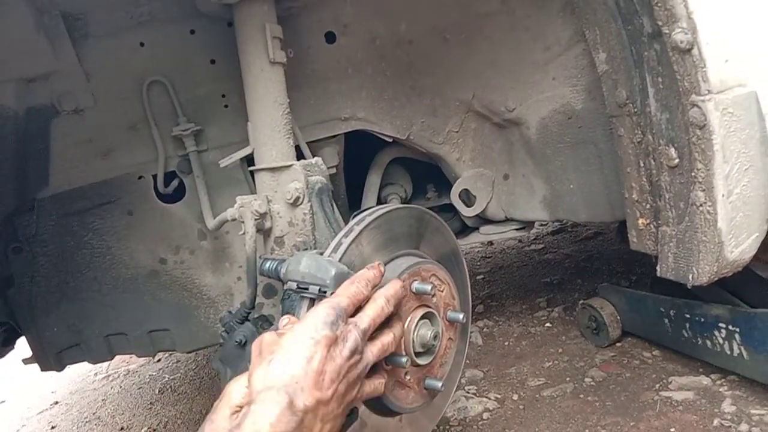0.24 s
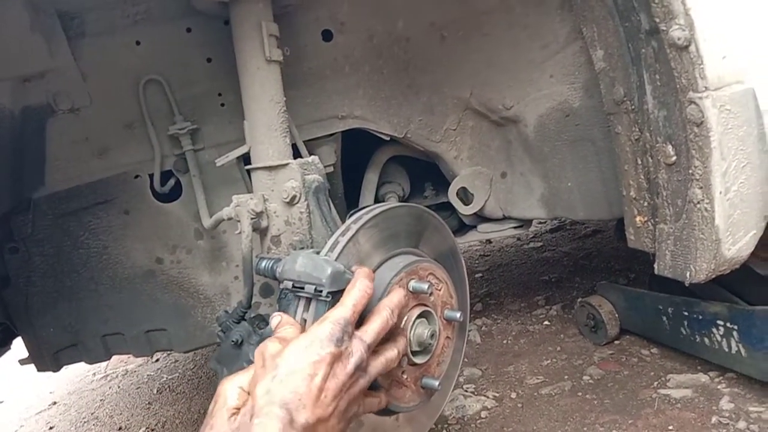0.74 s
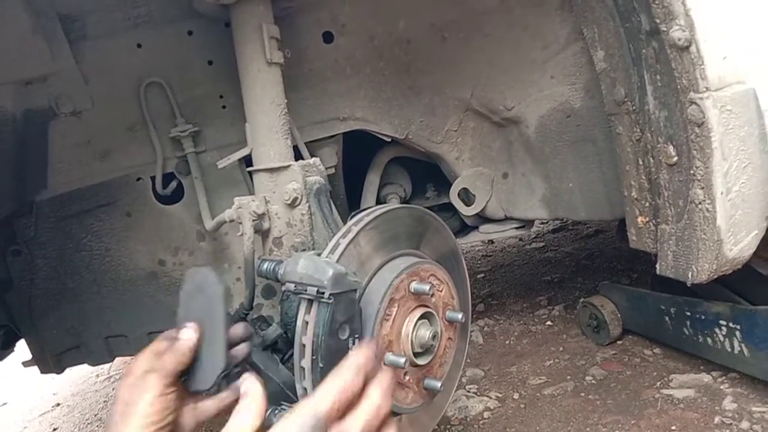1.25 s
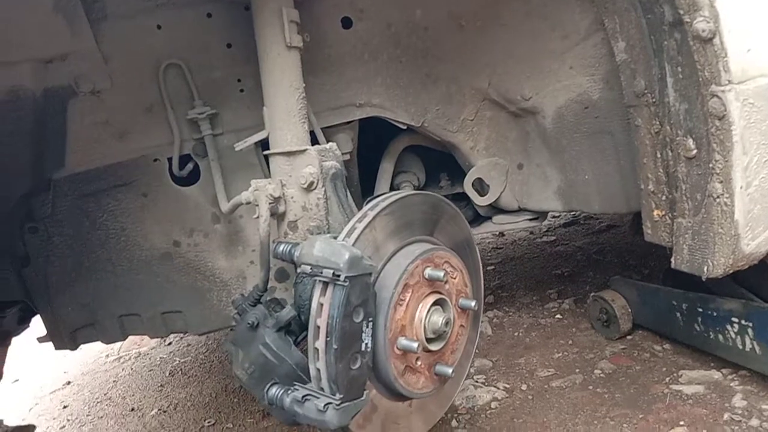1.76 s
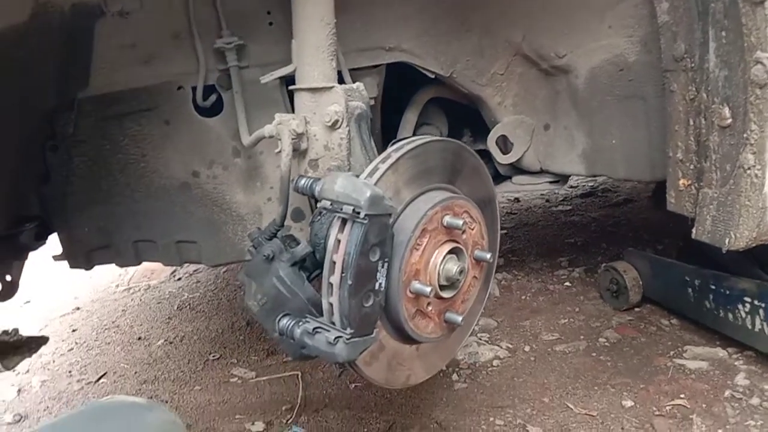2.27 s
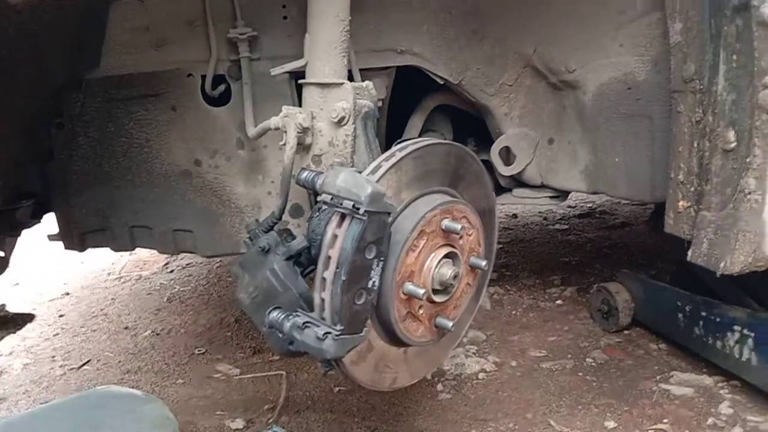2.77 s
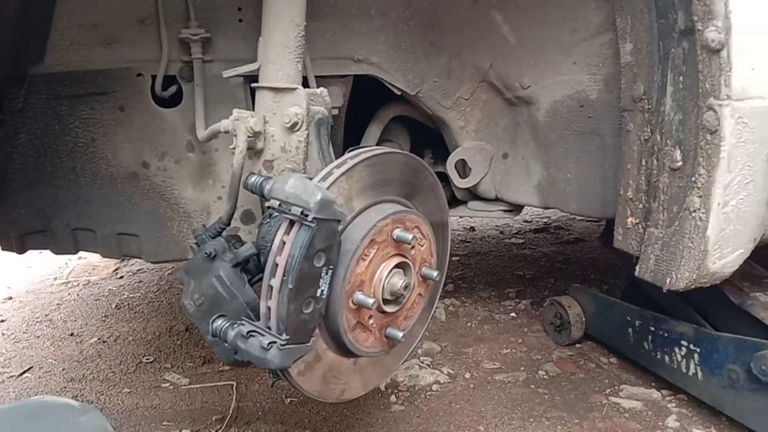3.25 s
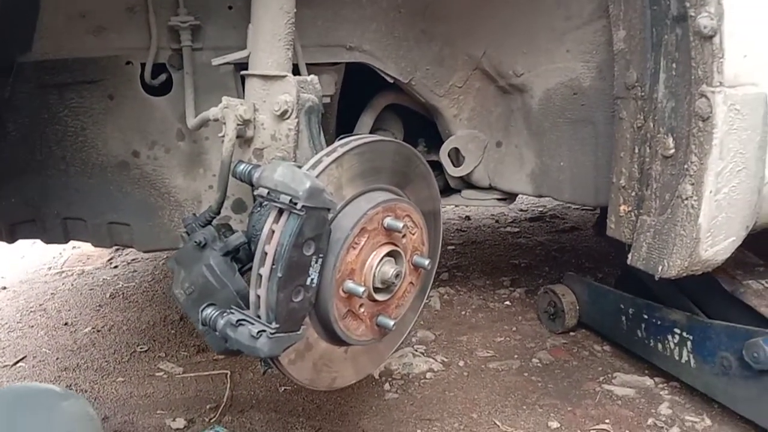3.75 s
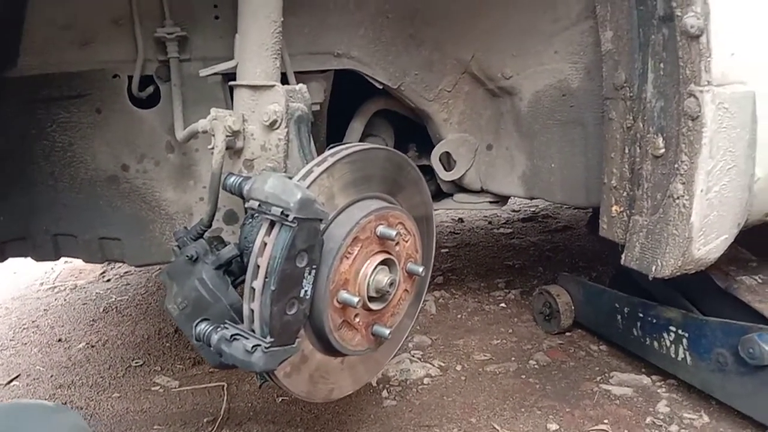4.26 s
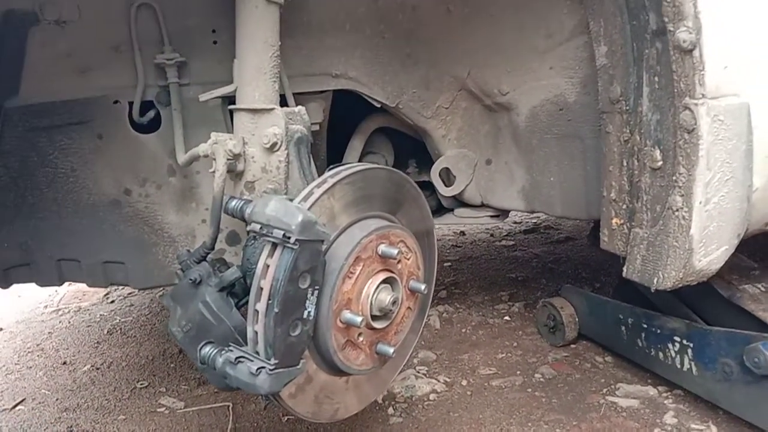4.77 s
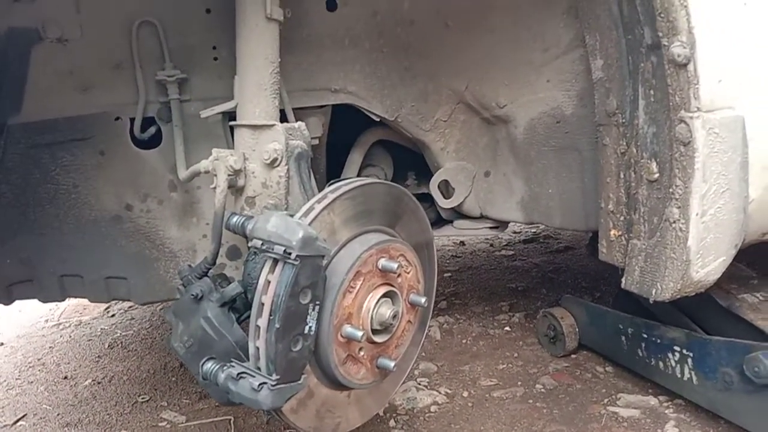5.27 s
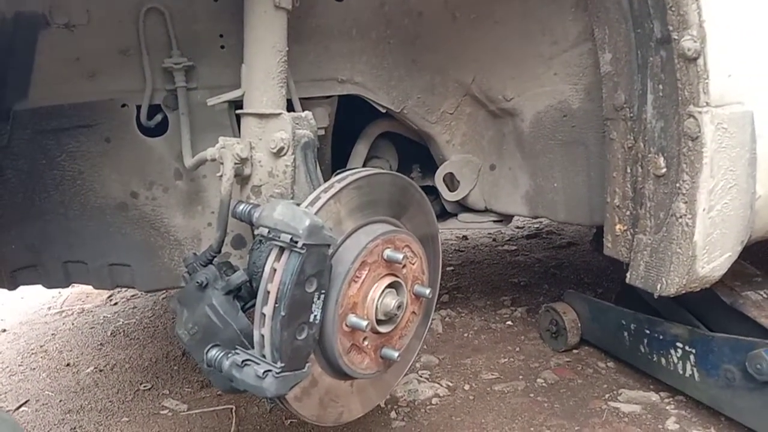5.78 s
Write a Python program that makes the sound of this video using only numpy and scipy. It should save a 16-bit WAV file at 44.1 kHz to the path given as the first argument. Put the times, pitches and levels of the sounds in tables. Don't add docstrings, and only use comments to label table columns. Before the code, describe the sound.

Distant hammering on steel echoes around an open yard while a brake pad knocks and squeaks into place nearby, then clatters hard on the ground.

```python
import sys
import numpy as np
from scipy import signal
from scipy.fft import rfft, irfft, next_fast_len
from scipy.io import wavfile
from scipy.ndimage import uniform_filter1d

SR = 44100
rng = np.random.default_rng(int(sys.argv[2]) if len(sys.argv) > 2 else 0)


def transcribe(signal):
    frames = np.atleast_2d(signal).T
    limited = np.clip(frames, -1, 1)
    pcm = np.round(limited * 32767).astype(np.int16)
    wavfile.write(sys.argv[1], SR, pcm)


def voltage_ratio(decibels):
    exponent = np.asarray(decibels, float) / 20
    return 10 ** exponent


N = 265526
SPAN = 16384
TOP_HZ = 15600
T, F = np.arange(SPAN) / SR, np.arange(SPAN // 2 + 1) * SR / SPAN
FADE = np.cos(np.pi * T * SR / SPAN / 2)
SCENE_F = np.arange(N // 2 + 1) * SR / N
RING_T = np.arange(SR // 2) / SR


def colour(f, points):
    hz, db = np.transpose(points)
    return voltage_ratio(np.interp(np.log(f + 1), np.log(hz), db))


def peak(f, hz, width):
    return 1 / (1 + 2j * (f - hz) / width)


def low(f, hz):
    return 1 / (1 + 1.4j * f / hz - (f / hz) ** 2) ** 2


def high(f, hz):
    return low(f, hz) * (f / hz) ** 4


def causal(gain):
    cepstrum = irfft(np.log(gain + 1e-9))
    half = len(cepstrum) // 2
    cepstrum[1:half] *= 2
    cepstrum[half + 1:] = 0
    return np.exp(rfft(cepstrum))


def swell(t, rise, t60):
    return (1 - np.exp(-(t / max(rise, 1e-4)) ** 2)) * voltage_ratio(-60 * t / max(t60, .01))


def add(out, s, x):
    i = int(s * SR)
    out[i:i + len(x)] += x[:N - i]


def level_to(x, db):
    return voltage_ratio(db) * x / np.sqrt(uniform_filter1d(x ** 2, size=200).max())


def curve(table):
    s, *columns = np.transpose(table)
    return [np.interp(np.arange(N) / SR, s, c) for c in columns]


def walk(rate, size=N):
    k = int(SR / rate)
    steps = np.repeat(rng.standard_normal(size // k + 1), k)
    return 1.28 * uniform_filter1d(uniform_filter1d(steps, k), k)[:size]


def noise(gain):
    size = next_fast_len(N)
    places = np.linspace(0, len(gain) - 1, size // 2 + 1)
    gain = np.interp(places, np.arange(len(gain)), np.abs(gain))
    x = irfft(gain * rfft(rng.standard_normal(size)), size)[:N]
    return x / np.std(x)


# (time [s], far bustle [dB], feet and cloth scuffing close by [dB])
BUSTLE = [(0.0, -38.5, -56), (0.22, -46, -60.5), (1.26, -47.5, -66), (2.9, -51.5, -65), (3.35, -51, -55.5),
          (3.62, -53, -62.5), (4.04, -49.5, -60), (4.21, -75, -40.5), (4.54, -53.5, -67),
          (5.72, -51, -56.5), (6.02, -58.5, -61)]
# (level at usual bustle [dB], rise per bustle [dB/dB], scuff level [dB])
FOLLOW = [
    (-69.5, -0.7, 2),
    (-74, 1, -1),
    (-50, 1, -1),
    (-63.5, 0.62, -12),
]


def bustle():
    far, near = curve(BUSTLE)
    levels = []
    for db, share, near_db in FOLLOW:
        power = voltage_ratio(db + share * (far + 49.5)) ** 2 + voltage_ratio(near + near_db) ** 2
        levels.append(10 * np.log10(power))
    whistle_db = -56 + 0.94 * (far + 50)
    return levels + [whistle_db]


# (time [s], drone level [dB])
MACHINE_LOAD = [(0.0, -57.5), (1.02, -60.5), (1.36, -59), (2.13, -62), (2.67, -54.5), (3.17, -62),
                (4.12, -56.5), (4.24, -59), (4.38, -61), (4.84, -65), (5.35, -63.5), (6.02, -66)]


def machine(whistle_db):
    drone_hz, drone_width, whistle_hz, whistle_width = 96.2, 39, 1267, 108
    f = SCENE_F
    drone = noise(peak(f, drone_hz, drone_width) * high(f, 40.0) * low(f, 267))
    drone = drone * voltage_ratio(4.5 + curve(MACHINE_LOAD)[0] + 3.2 * walk(20.99))
    whistle = noise(peak(f, whistle_hz, whistle_width) ** 2)
    return drone + voltage_ratio(whistle_db + 2.3 * walk(12)) * whistle


# (frequency [Hz], level per Hz [dB])
YARD = [(18, -43), (30, -0.5), (102, -1.5), (270, -8.5), (591, -5.5), (830, -13.5), (1080, -10.5),
        (1260, 0), (1510, -9), (3590, -12.5), (4660, -33), (8280, -38.5), (9430, -32), (12300, -64),
        (15500, -40.5)]


def yard():
    low_db, hollow_db, mid_db, high_db, whistle_db = bustle()
    out = machine(whistle_db)
    shape = colour(SCENE_F, YARD)
    # (first band [Hz], reference span from [Hz], to [Hz], level [dB])
    regions = [(30, 200, 600, low_db), (620, 650, 1100, hollow_db),
               (1150, 1500, 4500, mid_db), (4600, 5000, 15500, high_db)]
    for hz in 35 * 2 ** np.arange(0, 9, .5):
        _, lo, hi, db = [r for r in regions if r[0] <= hz][-1]
        band = shape * np.exp(-(np.log2((SCENE_F + 1) / hz) * 2) ** 2)
        inside = (SCENE_F > lo) & (SCENE_F < hi)
        share = np.sqrt(np.sum(band ** 2) / np.sum(shape[inside] ** 2))
        flicker_db, trim_db = (4.4, 5.5) if hz < 1100 else (3.2, 4.4)
        out = out + voltage_ratio(db + flicker_db * walk(18) - trim_db) * share * noise(band)
    return out


def clutter(lo_hz, ratio, level_db, t60):
    out, t = np.zeros(N), T[:SPAN // 2]
    for when, pitch, size, phase in rng.random((int(70 * N / SR), 4)):
        hz = min(lo_hz * ratio ** pitch, TOP_HZ)
        gain = colour(hz, YARD) * np.sqrt(hz) * voltage_ratio(11 * size)
        add(out, when * N / SR, gain * swell(t, 0.011, t60) * np.sin(2 * np.pi * (hz * t + phase)))
    return out / np.std(out) * voltage_ratio(level_db)


# (time [s], peak level [dB], centre [Hz], t60 [s])
TICKS = [(.098, -46.5, 5970, 0.21), (0.611, -51, 5300, 0.21), (0.741, -43, 14700, 0.12),
         (0.828, -41.5, 6900, 0.086), (.83, -35.5, 15400, 0.034), (1.373, -48, 5340, 0.23),
         (1.613, -54.5, 4940, 0.19), (2.03, -58, 8900, 0.13), (2.126, -49.5, 5400, 0.23),
         (2.389, -52.5, 6600, 0.27), (2.572, -50, 4000, 0.15), (2.635, -56, 6000, .12),
         (3.1, -56, 6000, .12), (2.885, -49.5, 5430, 0.21), (3.143, -46.5, 5660, 0.18),
         (3.356, -53, 9000, 0.072), (3.462, -50.5, 6650, 0.14), (3.544, -57.5, 7900, 0.16),
         (4.7688, -39.5, 9400, 0.025), (5.884, -54.5, 7300, 0.2), (3.3545, -41.5, 2980, 0.044),
         (3.4625, -49, 3500, .03), (2.752, -44.5, 5660, 0.043), (3.665, -45, 3000, 0.033),
         (4.545, -48.5, 7600, 0.096), (4.546, -58, 14800, .04), (5.457, -50, 8000, 0.035),
         (1.168, -47, 1200, .05), (4.894, -44, 2500, .04), (5.35, -52, 9800, 0.13)]
# (time [s], peak level [dB], centre [Hz], t60 [s], build-up [s])
RUBS = [(3.356, -38.5, 3470, 0.044, 0.0017), (3.375, -41.5, 3500, 0.066, 0.0044),
        (3.464, -44, 3320, 0.075, .002), (3.543, -44.5, 1980, 1, 0.0027), (3.67, -33, 3730, 0.055, 0.01),
        (3.72, -47, 960, 3.3, 0.2), (3.04, -54, 530, .8, .03), (3.37, -51, 450, .3, .01),
        (3.48, -52, 560, .25, .01), (3.67, -51, 420, .25, .01), (3.8, -51, 500, .4, .01)]


def ticks():
    out = np.zeros(N)
    rows = [(*r, 0.06 * r[3], 2200) for r in TICKS]
    rows += [(*r, max(0.11 * r[2], 220)) for r in RUBS]
    for s, db, hz, t60, rise, width in rows:
        grit = rng.standard_normal(SPAN) * voltage_ratio(2.0 * rng.exponential(size=SPAN)) * swell(T, rise, t60)
        x = irfft(rfft(grit * FADE) * peak(F, hz, width) ** 2, SPAN)
        add(out, s, level_to(x, db))
    return out


# (frequency [Hz], level [dB rms])
SHEET = [(296.1, -45), (387, -45), (446.8, -55.5), (524, -50), (899.0, -51.5), (1050, -44.5), (1093, -52),
         (1195, -54), (1300, -50), (1337, -41), (1405, -53), (1674, -47.5), (1755, -53), (1836, -58),
         (2148, -51), (2180, -65), (2229, -52), (2326, -52), (2670, -45), (2713, -47.5), (3110, -51),
         (3236, -46), (3273, -47.5), (5400, -60), (1490, -54), (2010, -59), (2460, -56), (2900, -56),
         (3460, -58.5)]


def sheet():
    out, t = np.zeros(N), RING_T
    for hz, db in SHEET:
        beat = 1 + min(hz / 1500, 1) * walk(70.3, size=len(t))
        hold_s = 0.29 * rng.uniform(0.72, 1.3) * min(hz / 900, 1) ** 0.32
        fade = np.exp(-(t / hold_s) ** 1.5) * np.cos(np.pi * t)
        turns = hz * t + rng.random() + .12 * walk(40, size=len(t))
        add(out, 0, voltage_ratio(3 + db) * fade * beat * np.sin(2 * np.pi * turns))
    return out


# (time [s], pitch [Hz], level [dB])
SQUEAK = [
    (5.47, 1850, -58),
    (5.49, 1990, -46),
    (5.53, 2340, -48),
    (5.555, 2460, -52),
]


def squeak():
    hz, db = curve(SQUEAK)
    t = np.arange(N) / SR
    rubbing = (t > SQUEAK[0][0]) * (t < SQUEAK[-1][0])
    return rubbing * voltage_ratio(db - 3 + 3 * walk(150)) * np.sin(2 * np.pi * np.cumsum(hz) / SR)


def lone_modes(rows):
    out, t = np.zeros(N), RING_T
    for s, hz, db, rise, t60 in rows:
        turns = np.cumsum(hz * (1 + 0.0022 * walk(35, size=len(t)))) / SR
        waver_db = 2.4 * walk(69.0, size=len(t)) * (1 - np.exp(-t / 0.036))
        add(out, s, voltage_ratio(db + waver_db) * swell(t, rise, t60) * np.sin(2 * np.pi * turns))
    return out


# (frequency [Hz], level [dB], t60 [s])
BUNCH_A = [(5770, -7.5, 0.47), (6315, -9, 5.0), (7100, 1, 0.18), (7602, -20, 11), (8700, -6, 3.5),
           (9000, -4, 0.16), (9810, -5, 0.36), (10175, -4, 0.49), (10660, -2.5, 0.33), (11600, -7, 0.28),
           (14100, -11, 0.25), (15130, -6, 0.36)]
BUNCH_B = [(4468, -9.5, 0.67), (5758, -1.5, 0.68), (7200, -8, 7.5), (9335, -6, 0.11), (10227, -10.5, 5.0),
           (10614, -5, 0.24), (11880, -31, 5.0), (14400, -14, 0.25), (14860, -5, 0.39), (15130, -3, 0.16)]


def spanners():
    rows = []
    for modes, s, gain_db in [(BUNCH_A, 1.76, -39.5), (BUNCH_B, 5.715, -48.5)]:
        rows += [(s, hz, db + gain_db, .012, min(t60, 0.45)) for hz, db, t60 in modes]
    return lone_modes(rows)


# (time [s], frequency [Hz], peak level [dB], build-up [s], t60 [s])
RINGS = [(.778, 454, -33, 0.0047, 0.1), (.772, 1300, -20, 0.0008, 0.06), (.779, 1900, -21, 0.0011, 0.05),
         (4.0905, 490, -6.5, 0.00055, .018), (4.1085, 480, -16, .0008, .025), (4.115, 560, -21, .002, .05),
         (4.3222, 480, -7, .0004, .015), (4.059, 417, -21.5, 0.0011, 0.027), (.816, 255, -24, 0.0024, .05),
         (4.167, 517, -16, 0.0028, 0.09), (4.301, 1880, -15.5, 0.0031, 0.2), (4.3, 5200, -34, 0.0016, 0.06),
         (4.322, 98, -17, 0.006, 0.12), (4.16, 81, -35, 0.0075, 0.11), (4.769, 7300, -25, 0.00064, 0.015)]
CLIP_RINGS = [
    (3.668, 2870, -38, .004, 0.32),
    (3.695, 4290, -50, .006, 0.29),
    (.78, 786, -39, 0.011, 0.57),
    (.79, 1440, -39, .01, 0.63),
    (4.36, 2230, -41, .02, .35),
    (4.37, 2330, -44, .02, .3),
    (4.36, 727, -51, .02, 0.63),
]
CHINKS = [(0.734, 2700, -22.5, 0.0027, 0.075), (0.67, 4400, -39, .006, 0.11),
          (.7295, 1100, -27, .001, 0.053), (0.7684, 1300, -20, 0.0018, 0.045),
          (.783, 1800, -31, .003, 0.081), (0.79, 2720, -30, 0.0026, 0.08), (.774, 3200, -22.5, .002, .04),
          (.79, 3660, -40, .003, .15), (4.091, 1860, -13.5, 0.00063, 0.025),
          (4.096, 520, -19, 0.0032, 0.095), (4.116, 1280, -28.5, .005, 0.19), (4.132, 3800, -31, .004, .06),
          (4.146, 2500, -30, .002, 0.054), (4.157, 2190, -19, .002, .05), (4.157, 3390, -23, .001, .04),
          (4.174, 1250, -15, .001, 0.037), (4.18, 1400, -29, .002, 0.058), (4.234, 1060, -21, .002, 0.048),
          (4.24, 1400, -20, 0.00091, .04), (4.243, 1890, -26.5, .003, 0.16),
          (4.302, 2400, -29, .001, 0.055), (4.322, 3450, -28, 0.00092, 0.03),
          (4.323, 290, -17.5, 0.0033, 0.094), (4.336, 3500, -37.5, .003, 0.053),
          (4.362, 3100, -41, .002, 0.035), (4.384, 3700, -37, 0.0009, .03),
          (3.678, 6900, -34.5, 0.0027, 0.052), (3.678, 6000, -39, .003, .06),
          (3.545, 8700, -60, .005, 0.25), (3.463, 5500, -50, .003, .12), (5.726, 3700, -40, 0.0036, 0.13),
          (1.765, 4000, -36.5, 0.0053, .15), (1.755, 14000, -42, .01, .25)]


def pad_rings():
    out, t = lone_modes(RINGS + CLIP_RINGS + CHINKS), RING_T
    sag = np.cumsum(210 + 260 * np.exp(-t / 0.014)) / SR
    add(out, .78, voltage_ratio(-26 + 4.0 * walk(60.0, size=len(t))) * swell(t, 0.012, 0.5) * np.sin(2 * np.pi * sag))
    seat_s = .0075
    seat = np.arange(int(seat_s * SR)) / SR
    turns = np.cumsum(1503 + 552 * np.sin(np.pi * seat / seat_s)) / SR
    add(out, .7718, voltage_ratio(-12.5) * swell(seat, .0007, 0.18) * np.sin(2 * np.pi * turns))
    return out


def wall_slaps(swarm, slap_db):
    delay_s, gap_s, spread_s, scatter_db = .034, .0044, .011, 3.5
    lag = gap_s * (np.arange(-5, 6) + 0.2003 * rng.standard_normal(11))
    slaps = voltage_ratio(slap_db + scatter_db * rng.standard_normal(11)) * np.exp(-(lag / spread_s) ** 2)
    swarm[((delay_s + lag) * SR).astype(int).clip(min=0)] += slaps


def blows(events, modes, body, main, edges_hz, lead_s, click_db, modes_db, sharp, spike_db, scatter_db,
          tail_db, tail_s, slap_db=-60, stretch=0.):
    out = np.zeros(N)
    bands = [high(F, 103) * low(F, edges_hz[0]), high(F, edges_hz[0]) * low(F, edges_hz[1]),
             high(F, edges_hz[1])]
    shapes = np.array([peak(F, hz, width / sharp) for hz, width, _ in modes])
    push = np.hanning(30) / 15
    tone = causal(colour(F, body))
    for s, db, rel_a, rel_b, rise, t60 in events:
        spikes_db = spike_db * rng.exponential(size=SPAN).clip(max=4.5)
        swarm = rng.standard_normal(SPAN) * voltage_ratio(spikes_db)
        swarm = swarm * (swell(T, rise, t60) + voltage_ratio(tail_db) * swell(T, 0.019, tail_s)) * FADE
        swarm *= voltage_ratio(1.3 * walk(160, size=SPAN))
        swarm[int(rise * SR):][:len(push)] += voltage_ratio(click_db) * push * min(0.00099 / rise, 1) ** 2
        wall_slaps(swarm, slap_db)
        spot = voltage_ratio(modes_db + scatter_db * rng.standard_normal(len(modes)))
        size = 1 + stretch * rng.standard_normal()
        sound = rfft(swarm) * tone * (1 + np.interp(F * size, F, spot @ shapes))
        levels = np.insert([db + rel_a, db + rel_b], main, db)
        for band, band_db in zip(bands, levels):
            add(out, s - lead_s, level_to(irfft(sound * band, SPAN) * FADE, band_db))
    return out


def shaped(rows, rise, t60):
    return [(*r, rise, t60) for r in rows]


# (time [s], peak level [dB], mids [dB], t60 [s])
JINGLE = [(0.3117, -34, -2, 0.42), (1.104, -37, 1, 0.35), (1.7507, -30.5, -15, 0.48),
          (1.766, -30, -4, 0.54), (2.2634, -36.5, -1, 0.33), (2.7516, -36, 0.5, 0.17),
          (3.6666, -55.5, 20, 0.11), (3.6748, -47.5, 18, 0.18), (3.9684, -39, -3.5, 0.64),
          (4.7678, -46, -15, 0.082), (5.2436, -40, 0.5, 0.2), (5.453, -49, 12.5, 0.13),
          (5.666, -34.5, 1.5, 0.15), (5.709, -35, -6, 0.27), (5.723, -33, -14, 0.31),
          (5.752, -36, -6, 0.37)]
# (frequency [Hz], width [Hz], level [dB])
TOOLS = [(3050, 30, -4), (3205, 35, -5), (3500, 120, -4), (3760, 20, 0), (4900, 20, -10), (5140, 74, -13),
         (5610, 170, -4), (6800, 20, -4), (6970, 11, -10), (7300, 14, -10), (7300, 72, -3), (7300, 20, -8),
         (7660, 64, -3), (7900, 24, -10), (8950, 53, -2), (9070, 77, -4), (9500, 13, -9), (9480, 88, -3),
         (10110, 160, -2), (10930, 63, -3), (11670, 26, -9), (12450, 39, -19), (12780, 45, -16),
         (13600, 32, -20), (14100, 79, -10), (14700, 31, -7), (14900, 140, -4)]
# (frequency [Hz], level [dB])
TOOLS_BODY = [(150, -38), (250, -20.5), (427, -20), (810, -34), (884, 2.5), (1250, -16), (2490, -10),
              (4120, -5), (4980, -18), (5620, -3.5), (10100, -2), (12700, -19.5), (15600, -4.5)]


def jingle():
    events = [(s, db, mids - 12, mids, 0.0091 * t60, t60) for s, db, mids, t60 in JINGLE]
    return voltage_ratio(-10) * blows(events, TOOLS, TOOLS_BODY, main=2, edges_hz=(2300, 4600), lead_s=0.0018,
                            click_db=7.1, modes_db=8, sharp=1.5, spike_db=2.4, scatter_db=4,
                            tail_db=-43, tail_s=0.69, stretch=.03)


# (time [s], peak level [dB], mids [dB], highs [dB])
KNOCK = [(0.774, -25.5, 12, -11), (4.058, -15, -12, -28), (4.066, -19.5, -20, -20), (4.09, -11, -6, -20),
         (4.108, -15, -5, -28), (4.116, -22, -10, -22), (4.13, -19.5, -3, -13), (4.14, -30.5, 7, -15),
         (4.156, -22, 6.5, -8), (4.167, -8.5, -16, -29), (4.173, -10, -3, -17.5), (4.216, -32.5, -15, -5),
         (4.231, -18.5, -8, -21), (4.25, -22.5, -5, -13), (4.259, -27, 3, -21), (4.294, -22, -2, -15),
         (4.299, -18, 0, -21), (4.322, -10, -11, -18), (4.355, -26, -14, -11), (4.367, -23, -18, -13.5)]
SETTLE = [
    (0.731, -52, 30, 8),
    (0.79, -24.5, 0, -32),
    (0.814, -28, 0, -12),
    (4.097, -34, -8, -27),
    (4.239, -20, -3.5, -20),
    (4.328, -19, -7.5, -22),
    (4.383, -28, -7, -26),
    (4.409, -31, -24, -39),
    (4.766, -34.5, -1.5, -7.5),
]
# (frequency [Hz], width [Hz], level [dB])
PAD = [(533, 47, 0), (1200, 400, -10), (1680, 6, -11), (1855, 21, -6), (2420, 160, -18), (2720, 460, -18),
       (3300, 31, -19), (3500, 67, -17), (3930, 140, -24), (4900, 13, -32), (5370, 16, -32)]
# (frequency [Hz], level [dB])
PAD_BODY = [(35, -30), (60, -7.5), (200, -7), (376, -3), (497, -0.5), (810, -10), (1870, -2.5),
            (2590, -15.5), (3420, -12), (4850, -22.5), (6870, -18), (15500, -37.5)]


def brake_pad():
    events = shaped(KNOCK, 0.001143, 0.059) + shaped(SETTLE, 0.00133, 0.13)
    return voltage_ratio(-8.5) * blows(events, PAD, PAD_BODY, main=0, edges_hz=(850, 4700), lead_s=.0005,
                             click_db=26.7, modes_db=1.2, sharp=0.65, spike_db=0.56, scatter_db=5.4,
                             tail_db=-27.5, tail_s=0.48)


# (time [s], peak level [dB], lows [dB], highs [dB])
HAMMER = [(0.1541, -27.5, -8, -20.5), (0.3965, -24.5, -9.5, -11.5), (0.6665, -26, -20, -17),
          (0.9329, -29, -5.5, -26), (1.1668, -26, -19, -17.5), (1.4161, -27, -21.5, -24),
          (1.697, -35.5, -13.5, -42), (1.8338, -35, -9, -4), (1.9233, -24, -14.5, -17),
          (2.175, -25.5, -18, -15.5), (2.4464, -30.5, -17, -20), (2.9211, -23, -16, -12.5),
          (3.1957, -24.5, -12, -21)]
HAMMER_LATE = [
    (4.5459, -44, 2, -8),
    (4.8792, -28.5, -4, -7),
    (5.0752, -18, -13, -17),
    (5.3183, -23, -12.5, -18.5),
    (5.5438, -24.5, -8.5, -15),
    (5.7703, -23.5, -13.5, -30),
]
# (frequency [Hz], width [Hz], level [dB])
STEEL = [(343.3, 20, -13), (968, 56, -2), (1257, 21, -5), (1814, 90, -4), (2060, 12, -6), (2315, 43, 0),
         (2714, 27, -5), (2957, 110, -1), (3273, 560, -3), (3800, 260, -5), (4050, 38, -7), (4500, 17, -16),
         (5074, 150, -14), (5520, 66, -16), (5660, 17, -17), (6850, 21, -16)]
# (frequency [Hz], level [dB])
STEEL_BODY = [(120, -68), (200, -17.5), (339, -11), (414, -17), (755, -15), (827, -14.5), (1260, -2.5),
              (1590, -10), (2290, -3), (4660, -16.5), (5590, -18), (15500, -27.5)]
LATE_BODY = [(120, -51), (200, -24.5), (497, -11.5), (874, -10), (974, -5), (1090, -8.5), (2210, -11.5),
             (3240, -4.5), (4660, -12.5), (6590, -10.5), (15500, -26.5)]


def hammering():
    first = blows(shaped(HAMMER, 0.025, 0.25), STEEL, STEEL_BODY, main=1, edges_hz=(850, 4600),
                  lead_s=.013, click_db=0, modes_db=7, sharp=1.6, spike_db=3, scatter_db=4,
                  tail_db=-45, tail_s=0.72, slap_db=17)
    late = blows(shaped(HAMMER_LATE, 0.022, 0.29), STEEL, LATE_BODY, main=1, edges_hz=(850, 4600),
                 lead_s=0.011, click_db=0, modes_db=1.506, sharp=0.75, spike_db=2.34, scatter_db=2.2,
                 tail_db=-19.5, tail_s=1.0, slap_db=20)
    return first * voltage_ratio(-6.0) + late * voltage_ratio(-9.0)


# (frequency [Hz], level [dB])
MIC = [(8000, 0), (10500, 4.5), (12500, -16), (14000, -4), (15200, -1.5)]
# (frequency [Hz], level [dB])
CHANNEL_GAP = [(40, -29), (90, -38), (180, -49), (350, -35), (1400, -36.5), (3000, -34), (5600, -28), (9500, -47),
               (14000, -22)]


def scene():
    mid_db, high_db = bustle()[2:4]
    distant = clutter(250, 17., mid_db - 9.5, 0.17) + clutter(4500, 3.0, high_db - 11, 0.068)
    self_hiss = voltage_ratio(-79.5) * noise(high(SCENE_F, 10500))
    background = yard() + distant + self_hiss
    ringing = sheet() + squeak() + spanners() + pad_rings()
    struck = irfft(rfft(brake_pad() + hammering()) * colour(SCENE_F, MIC), N)
    mid = background + ticks() + ringing + jingle() + struck
    side = voltage_ratio(-34.5) * (mid - np.roll(mid, 2))
    side = side + irfft(rfft(np.roll(mid, 400)) * colour(SCENE_F, CHANNEL_GAP), N)
    return np.array([mid + side, mid - side])


def roll_off(x):
    return signal.sosfilt(signal.butter(12, 16640, fs=SR, output="sos"), x)


def record(dry):
    dry = signal.sosfilt(signal.butter(2, 55, "high", fs=SR, output="sos"), dry)
    dry = signal.sosfilt(signal.ellip(8, .3, 50, TOP_HZ, fs=SR, output="sos"), dry)
    return roll_off(dry)


dry = scene()
out = record(dry)
transcribe(out)
```